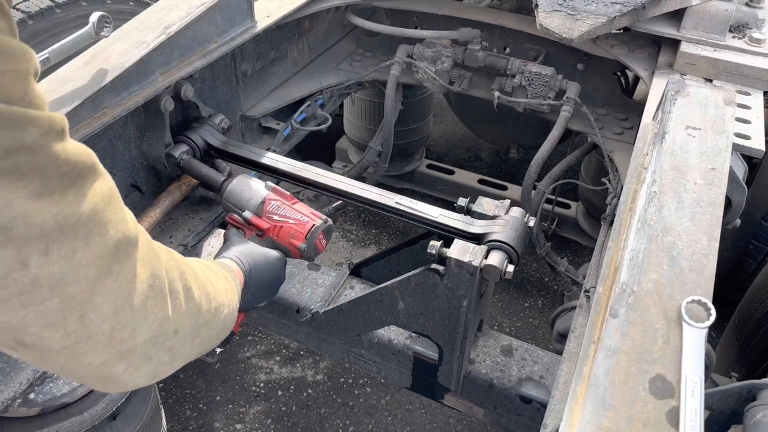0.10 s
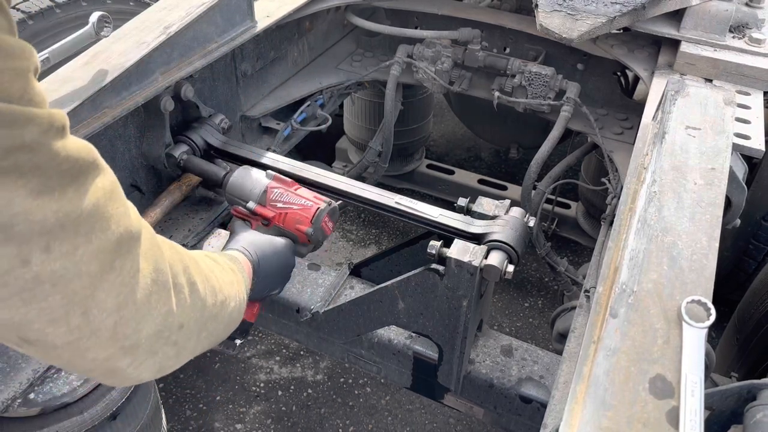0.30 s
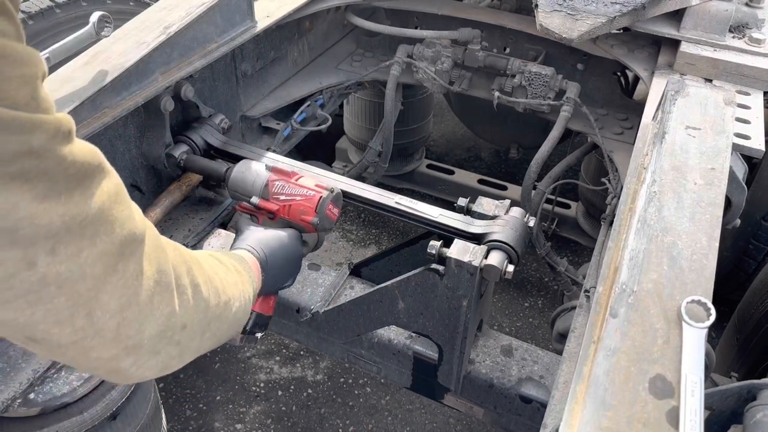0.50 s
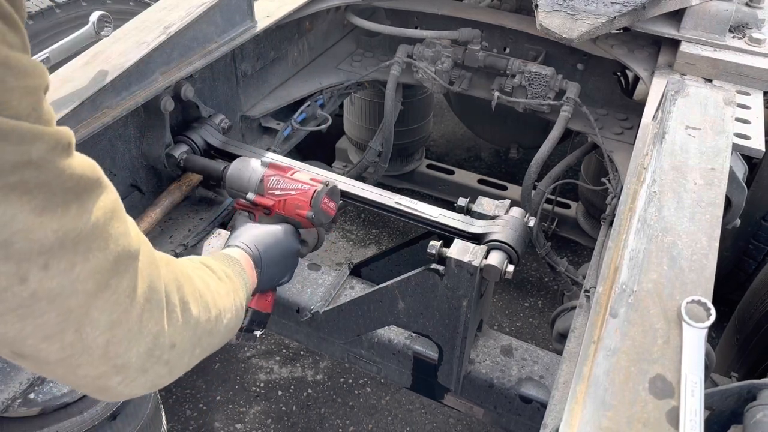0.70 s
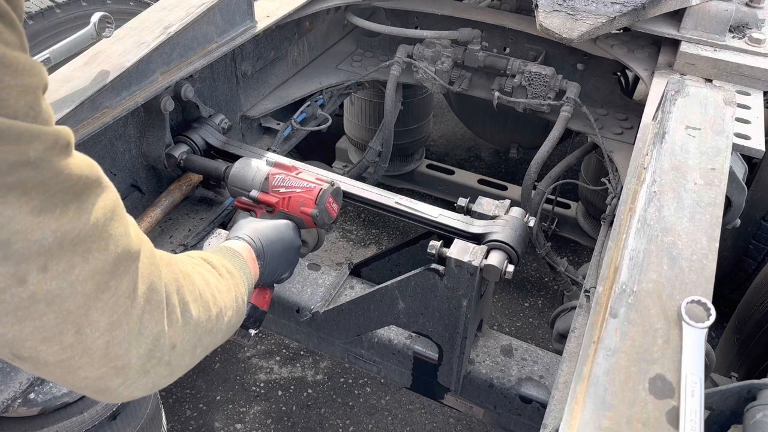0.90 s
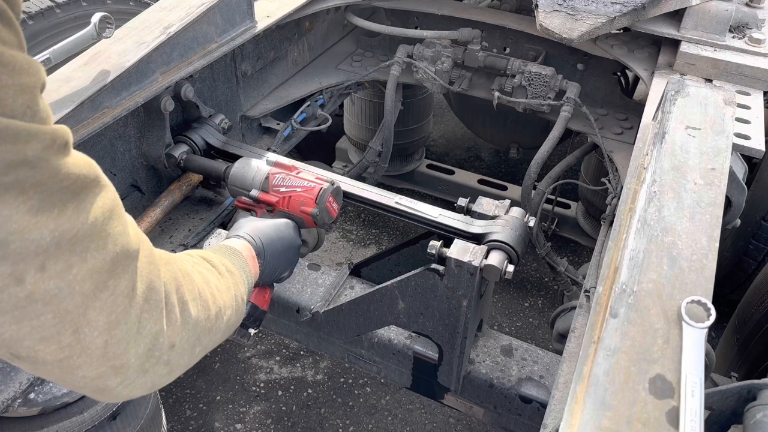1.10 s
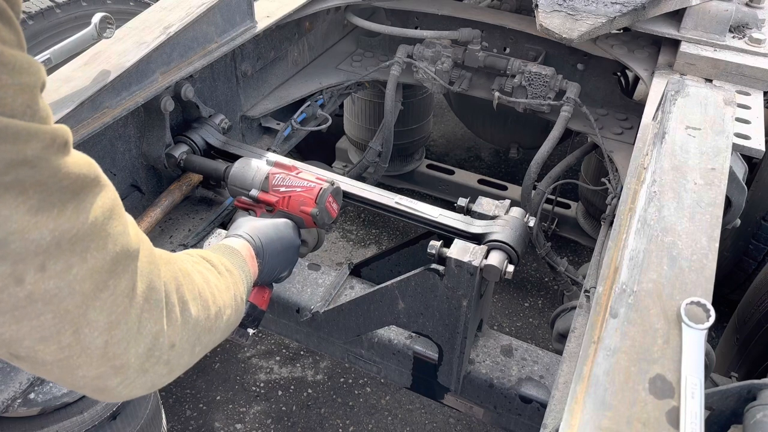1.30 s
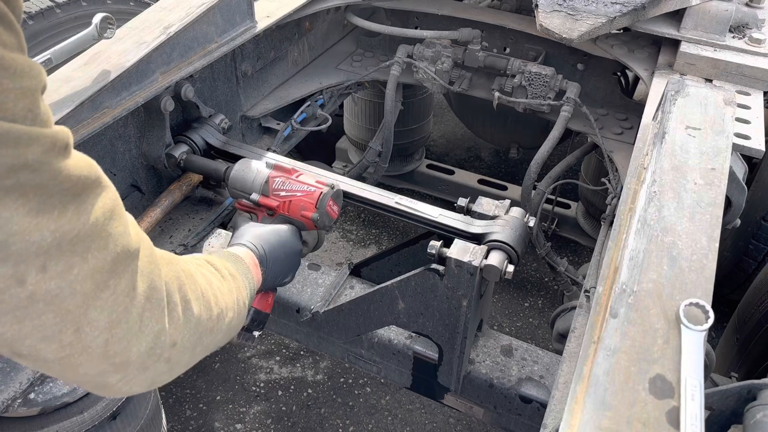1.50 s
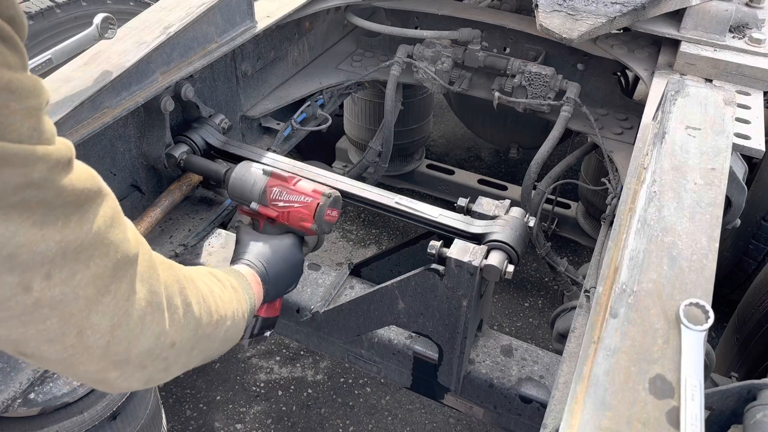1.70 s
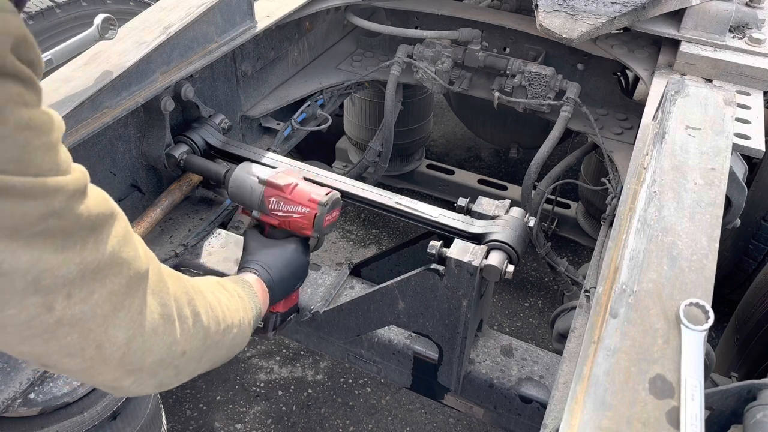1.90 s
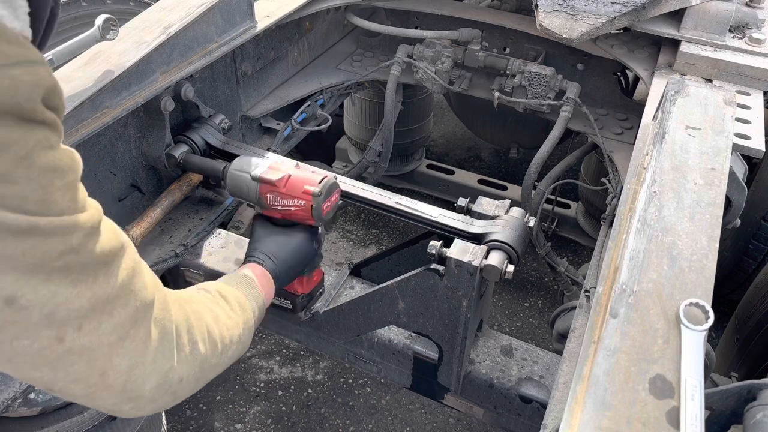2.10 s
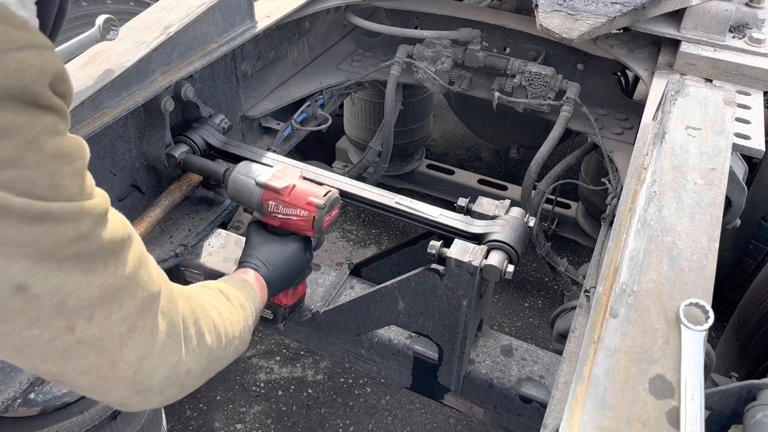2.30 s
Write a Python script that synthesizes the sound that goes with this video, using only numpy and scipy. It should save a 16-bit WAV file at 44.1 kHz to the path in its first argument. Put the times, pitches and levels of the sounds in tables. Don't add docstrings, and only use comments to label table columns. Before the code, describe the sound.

A cordless impact wrench hammers one short burst on a bolt between loose steel socket knocks

```python
import sys
import numpy as np
from scipy import signal
from scipy.fft import rfft, irfft
from scipy.io import wavfile

SR = 44100
rng = np.random.default_rng(int(sys.argv[2]) if len(sys.argv) > 2 else 0)


def field_ratio(decibels):
    return 10 ** (np.asarray(decibels, dtype=float) / 20)


def to_wav(s):
    ch = np.atleast_2d(s).T
    pcm = np.round(np.clip(ch, -1, 1) * 32767)
    wavfile.write(sys.argv[1], SR, pcm.astype(np.int16))


N = 110250

# (time [s], peak [dB], frame thud [dB], loudest clang [Hz], clang [dB])
BLOWS = [
    (0.9803, -15, -24, 8800, -15.5),
    (1.003, -12.5, -17.5, 4100, -22.5),
    (1.0326, -13, -13, 2800, -28),
    (1.0587, -15, -16, 4910, -14),
    (1.0816, -16, -13, 3640, -25),
    (1.1098, -14, -15.5, 6900, -27),
    (1.1378, -15, -12.5, 3575, -26.5),
]


def rms_one(x):
    return x / np.sqrt(np.mean(x ** 2) + 1e-20)


def at_hz(points, hz):
    table_hz, value = np.transpose(points)
    return np.interp(np.log(hz), np.log(table_hz), value)


def in_time(rows):
    return np.interp(np.arange(N) / SR, *np.transpose(rows))


def drift(rate_hz):
    r = np.exp(-2 * np.pi * rate_hz * 40 / SR)
    slow = signal.lfilter([1], [1, -2 * r, r * r], rng.standard_normal(N // 40 + 2002))[2000:]
    return np.interp(np.arange(N) / 40, np.arange(len(slow)), rms_one(slow))


def clicks(s, gain):
    out = np.full(N, 1e-18)
    out[(np.asarray(s) * SR).astype(int)] = gain
    return out


def dying(train, t60_s):
    return signal.lfilter([1], [1, -field_ratio(-60 / (t60_s * SR))], train)


def ring(train, hz, t60_s):
    r = field_ratio(-60 / (t60_s * SR))
    w = 2 * np.pi * hz / SR
    return signal.lfilter([0, np.sin(w)], [1, -2 * r * np.cos(w), r * r], train)


def bands(colour):
    # (frequency [Hz], likeness [0..1])
    likeness = [(30, 0.61), (180, 0.94), (550, 0.37), (1650, 0.5), (4500, 0.24), (9500, 0.51),
                (15000, 0.99)]
    low_hz, high_hz = colour[0][0], colour[-1][0]
    edges_hz = np.geomspace(low_hz, high_hz, int(3 * np.log2(high_hz / low_hz)) + 1)
    centres_hz = np.sqrt(edges_hz[1:] * edges_hz[:-1])
    total = np.sqrt(np.sum(field_ratio(at_hz(colour, centres_hz)) ** 2 * np.diff(edges_hz)) * 4 / SR)
    white = rng.standard_normal((2, 2, N))
    for k, hz in enumerate(centres_hz):
        band = signal.butter(2, edges_hz[k:k + 2], "band", fs=SR, output="sos")
        mid, side = signal.sosfilt(band, white[k % 2])
        alike = np.clip(at_hz(likeness, hz), 0, .99)
        stereo = np.sqrt(1 + alike) * mid + np.sqrt(1 - alike) * side * [[1], [-1]]
        yield hz, field_ratio(at_hz(colour, hz)) / total * stereo


def steel(s, db, chance_db, modes):
    out = np.zeros((2, N))
    for k, (hz, level_db, t60_s) in enumerate(modes):
        for side in (0, 1):
            sense = (-1) ** (side * (k % 4 == 1))
            out[side] += sense * ring(clicks(s, field_ratio(db + level_db + chance_db[:, k + side])), hz, t60_s)
    return out


def puff(s, db, hz, cycles):
    t = np.arange(N) / SR
    swell = np.exp(-((t - s) * hz / (.5 * cycles)) ** 2)
    return field_ratio(db) * swell * np.sin(2 * np.pi * hz * (s - t))


def yard():
    # (frequency [Hz], density [dB per Hz])
    hum_colour = [(150, -43), (300, 4.5), (1000, -7.5), (3000, -23), (5500, -32.5), (9700, -22.5),
                  (11500, -46.5), (15500, -42)]
    # (frequency [Hz], rms [dB])
    faint_tones = [
        (8500, -80),
        (14368, -70),
    ]
    t = np.arange(N) / SR
    swell = drift(3)
    hum = sum(band * field_ratio(.8 * swell + 1.2 * drift(8)) for hz, band in bands(hum_colour))
    tones = sum(field_ratio(db + 3 + 2.5 * drift(25)) * np.sin(2 * np.pi * hz * t + .4 * drift(20))
                for hz, db in faint_tones)
    return field_ratio(-51) * hum + tones


def wind():
    # (time [s], level [dB])
    gust = [(0, -32.5), (.13, -39.5), (.18, -38.5), (.22, -29), (.36, -20.5), (.43, -27.5), (.53, -19.5),
            (.565, -25), (.61, -27), (.67, -22), (.73, -32), (.86, -41), (.96, -31.5), (1.01, -41.5),
            (1.3, -34), (1.37, -41.5), (1.75, -37), (2.15, -39), (2.5, -54.5)]
    # (frequency [Hz], density [dB per Hz])
    gust_colour = [(12, -36), (20, -4.5), (75, 4), (133, -2.5), (286, -14), (644, -51), (755, -34),
                   (900, -50.5), (1170, -63), (1980, -120)]
    # (centre [s], peak [dB], frequency [Hz], length [cycles])
    puffs = [(.359, -5.5, 112, 0.43), (0.378, -9, 151, 0.92), (0.451, -43, 73, 0.37),
             (0.47, -17.5, 129, 0.61), (0.502, -11.5, 96, 0.84), (0.398, -14.5, 172, 0.68),
             (0.367, -13, 91.5, 0.33), (0.328, -16.5, 118, 1.3), (0.5305, -11, 171, 0.7),
             (0.5375, -8, 163, 1.3), (0.5466, -11, 95, 0.72), (.590, -2, 170, 0.72),
             (0.605, -10, 112, 0.85), (0.617, -18, 169, 1.5), (0.957, -21.5, 203, 0.65),
             (1.541, -24, 169, 1.28), (1.627, -34, 108.6, 2.5), (1.755, -19, 147, 1.33),
             (1.876, -27, 104, 1.4), (2.004, -39, 131, 1.4), (2.114, -18, 218, 1.55)]
    lumps = drift(36.8)
    noise = sum(band * field_ratio(1.5 * lumps + 2 * drift(10)) for hz, band in bands(gust_colour))
    out = field_ratio(in_time(gust) + 1.5) * noise
    for s, db, hz, cycles in puffs:
        out = out + puff(s, db, hz, cycles) * field_ratio(np.array([[.3], [-.3]]))
    return out


def knocks():
    # (time [s], peak [dB], brightness [dB per octave], decay scale [ratio])
    contacts = [(0.0014, -28, 0.55, 1.7), (0.0183, -34.5, 4.5, 0.51), (0.024, -35.5, 2, 1.7),
                (0.0784, -26, 0.5, 1.56), (0.2706, -18, -1.4, 1.75), (0.2741, -33.5, 6, 0.64),
                (0.286, -43, 3, 0.21), (0.3225, -32, 1, 0.31), (0.326, -27, 0.6, 0.95),
                (0.3792, -31, -2.5, 0.38), (0.386, -36, -6, 1.83), (0.4445, -38.5, -3, 0.48),
                (0.505, -41, -7, 0.62), (0.516, -48, 4, 0.6), (0.583, -43.5, -15, 0.33),
                (0.6061, -34.5, -9, 1.24), (0.7436, -43, 8.5, 3), (1.4, -41.5, 5, 1.05),
                (1.7803, -23.5, 5, 1.5), (1.7905, -32.5, -1, 0.41), (1.8, -36, 2, 1.4),
                (1.8486, -42.5, 4, 1.3), (2.0112, -43.5, 1.5, 3.7), (2.0966, -41, -2, 1.8),
                (2.12, -28.5, 0, 0.95), (2.157, -40.5, -1.5, 0.97), (2.45, -44.5, -3.5, 2.8)]
    # (frequency [Hz], density [dB per Hz])
    rattle_colour = [(150, -17.5), (250, -3.5), (429, -10), (750, -9), (1530, -12.5), (6140, -36),
                     (9330, -27.5), (13200, -58), (15200, -38), (16000, -52)]
    # (frequency [Hz], t60 [s])
    rattle_t60 = [(250, 0.18), (1000, 0.11), (4000, 0.098), (8000, 0.046), (16000, 0.016)]
    # (frequency [Hz], level [dB], t60 [s])
    socket = [(1090, -12.5, 0.053), (1437, -9, .08), (1840, 0, 0.11), (2276, -3.5, 0.12), (3060, -7, 0.093),
              (3480, -5.5, 0.09), (4000, -10.5, 0.064), (4290, -9.5, 0.067), (4850, -6, 0.063),
              (5370, -2.5, 0.036), (9300, -2, 0.07)]
    # (time [s], frequency [Hz], level [dB], t60 [s])
    rings = [(0.272, 770, -25.5, 0.052), (0.281, 1417, -30.5, 0.052), (0.29, 643, -27.5, 0.13),
             (0.6058, 747, -34.5, 0.084), (0.746, 4150, -53, 0.07), (1.781, 4850, -37, .08),
             (1.782, 3586, -36, .1), (1.785, 259, -27.5, 0.086), (1.799, 420, -35, 0.22),
             (2.1013, 2800, -52, .03), (2.1212, 990, -40.5, 0.069)]
    rattle_db, soft_below_db, soft_s_per_db = -5, -36, .0012
    chance_db = rng.normal(0, 2, (len(contacts), 30))
    t = np.arange(N) / SR
    out = 0
    for k, (hz, noise) in enumerate(bands(rattle_colour)):
        shape = np.zeros(N)
        for (s, db, tilt_db, scale), own_db in zip(contacts, chance_db):
            i = int(s * SR)
            age = t[:min(N - i, SR // 5)]
            t60_s = max(scale, .1) * at_hz(rattle_t60, hz)
            level_db = db + rattle_db + own_db[k] + tilt_db * np.log2(hz / 2000)
            rise_s = 0.57 / hz + soft_s_per_db * max(soft_below_db - db, 0)
            shape[i:i + len(age)] += field_ratio(level_db - 60 * age / t60_s) * np.minimum(age / rise_s, 1)
        out = out + shape * noise
    s, db, tilt_db, scale = np.transpose(contacts)
    steel_db = db - 23 + 3 * np.minimum(tilt_db, 4) + 2 * np.minimum(db - soft_below_db, 0)
    out = out + steel(s, steel_db, chance_db[:, 15:], socket)
    for at_s, hz, level_db, t60_s in rings:
        for pair in (1, 1.06):
            out = out + ring(clicks([at_s], field_ratio(level_db)), hz * pair, t60_s)
    latch = [1, 3]
    return out + ring(clicks(s[latch], field_ratio(db[latch] - 15)), 14700, .035)


def motor():
    # (frequency [Hz], share of the split [ratio], rms [dB], off [s])
    tones = [
        (7700, -1, -40, .985),
        (7700, 1, -41, .985),
        (15402, -.3, -55, 1.15),
        (15477, .3, -54, 1.15),
    ]
    # (time [s], level [dB])
    effort = [
        (.87, -85),
        (.882, -56),
        (.92, -67),
        (.94, -54.5),
        (.975, -40),
        (1.13, -42),
        (1.17, -43),
        (1.21, -77.5),
    ]
    # (frequency [Hz], density [dB per Hz])
    gear_colour = [(800, -7.5), (2800, -4), (6500, -12.5), (10500, -1), (13000, -35.5), (15800, -16)]
    on_s, rise_db_per_s, split_hz_per_s = .867, 50, 1400
    t = np.arange(N) / SR
    rise = np.clip((t - on_s) / .004, 0, 1) * field_ratio(rise_db_per_s * np.clip(t - .925, -.1, .05))
    wander_hz = 25 + 250 * (t > BLOWS[0][0])
    split_hz = 40 + split_hz_per_s * np.clip(t - on_s, 0, .12)
    whine = 0
    for hz, share, db, off_s in tones:
        level = np.clip((off_s - t) * 100, 0, 1) * field_ratio(db + 5 - drift(60))
        tone_hz = hz + share * split_hz + wander_hz * drift(120)
        whine = whine + level * np.sin(2 * np.pi * np.cumsum(tone_hz) / SR)
    gears = sum(noise * field_ratio(2.5 * drift(80)) for hz, noise in bands(gear_colour))
    mesh = rms_one(ring(rng.standard_normal(N), 2800, .025))
    return rise * whine + field_ratio(in_time(effort)) * (gears + field_ratio(-3) * mesh)


def hammer():
    # (frequency [Hz], density [dB per Hz])
    blow_colour = [(500, -7), (1300, -6), (3600, -11), (4900, -13), (6800, -18), (9500, -9), (11500, -22.5),
                   (16300, -13)]
    # (frequency [Hz], t60 [s])
    blow_t60 = [(500, 0.23), (2000, 0.18), (5000, 0.15), (7000, 0.12), (16000, 0.033)]
    # (frequency [Hz], width [Hz], level [dB])
    anvil = [(1390, 79, -9), (2247, 77, 2), (2516, 48, -2.5), (2720, 120, -0.5), (3640, 41, -4.5),
             (3950, 67, -15), (4366, 46, 1.5), (4620, 76, -4.5), (4850, 91, 3), (6020, 90, -9),
             (7380, 230, -12), (8800, 250, 2), (9590, 350, 14), (11000, 300, -7.5)]
    # (frequency [Hz], level [dB], t60 [s])
    frame = [
        (150, -4, 0.16),
        (225, 4, 0.11),
        (250, 9, 0.053),
        (300.6, 2.5, 0.13),
        (360, -5, 0.1),
        (482, 3, 0.12),
    ]
    blow_db, bounce_db, bounce_s, crack_db, crack_t60_s, seat_s = -11, -10, .0039, 12, .011, .005
    s, db, thud_db, clang_hz, clang_db = np.transpose(BLOWS)
    chance_db = rng.normal(0, 2, (len(s), 90))

    modes = [(hz, level_db, 3.2 / width_hz) for hz, width_hz, level_db in anvil]
    out = steel(s, db - 15.5, 2 * chance_db[:, 30:], modes)
    late_s = (s[:, None] + .02 * rng.random((len(s), 3))).ravel()
    modes = [(hz, level_db, 5.2 / width_hz) for hz, width_hz, level_db in anvil[1:11]]
    out = out + steel(late_s, np.repeat(db, 3) - 28.5, rng.normal(0, 3.1, (len(late_s), 14)), modes)
    for at_s, hz, level_db in zip(s, clang_hz, clang_db):
        out = out + ring(clicks([at_s, at_s + bounce_s / 2], field_ratio(level_db)), hz, .031)

    for k, (hz, noise) in enumerate(bands(blow_colour)):
        train = clicks(s, field_ratio(db + blow_db + chance_db[:, k]))
        bounced_db = db + blow_db + bounce_db + 2 * chance_db[:, 60 + k]
        train = train + clicks(s + bounce_s * field_ratio(chance_db[:, 89]), field_ratio(bounced_db))
        train = train + clicks([1.0552], field_ratio(-26.5 + blow_db))
        seat = dying(train, seat_s)
        crack = field_ratio(crack_db) * np.sqrt(hz / 8000) * (dying(train, crack_t60_s) - seat)
        out = out + noise * (dying(train, at_hz(blow_t60, hz)) + crack - seat)

    thud = 0
    for k, (hz, level_db, t60_s) in enumerate(frame):
        train = clicks(s + .00556, field_ratio(thud_db + level_db + chance_db[:, 50 + k]))
        thud = thud + (-1) ** k * ring(train, hz, t60_s)
    for at_s, push_db, own_db in zip(s, thud_db, chance_db[:, 59]):
        out = out + puff(at_s + .00731, push_db + 4, 259.7 * field_ratio(0.12 * own_db), 1.81)
    return out + 0.39 * signal.sosfilt(signal.butter(3, [108, 477], "band", fs=SR, output="sos"), thud)


def scene():
    pan_db = 2.5 * np.array([[.5], [-.5]])
    return (knocks() + hammer() + motor()) * field_ratio(pan_db) + wind() + yard()


def roll_off(x):
    return signal.sosfilt(signal.butter(12, 16660, fs=SR, output="sos"), x)


def record(dry):
    right_lag_s, low_cut_hz, high_cut_hz = 65e-6, 42, 16400
    turn = np.exp(-2j * np.pi * np.fft.rfftfreq(N, 1 / SR) * right_lag_s)
    late = irfft(rfft(dry[1]) * turn, N)
    cut = signal.sosfilt(signal.cheby2(10, 50, high_cut_hz, fs=SR, output="sos"), [dry[0], late])
    cut = signal.sosfilt(signal.butter(2, low_cut_hz, "high", fs=SR, output="sos"), cut)
    return roll_off(cut)


dry = scene()
out = record(dry)
to_wav(out)
```